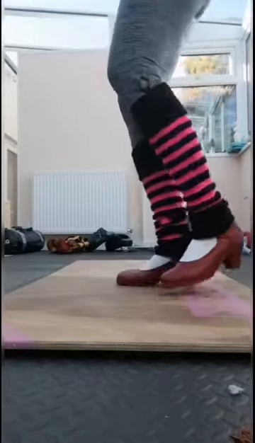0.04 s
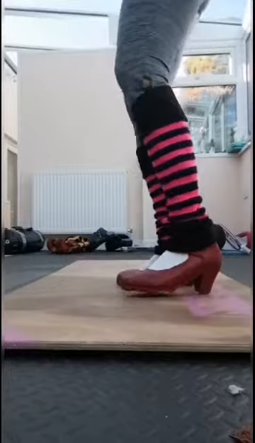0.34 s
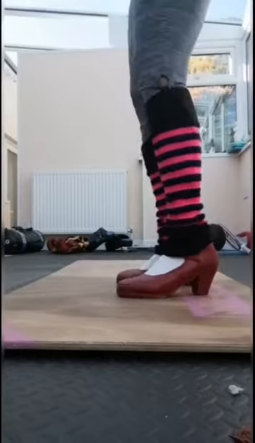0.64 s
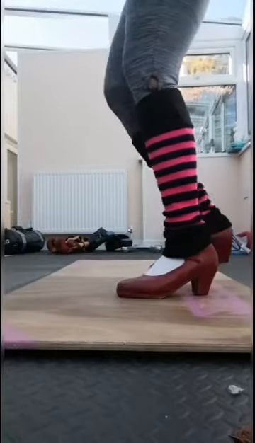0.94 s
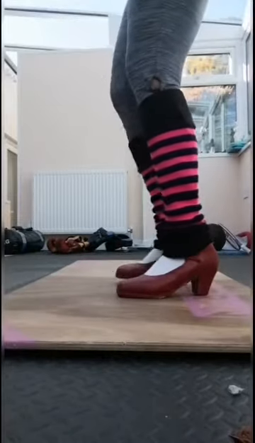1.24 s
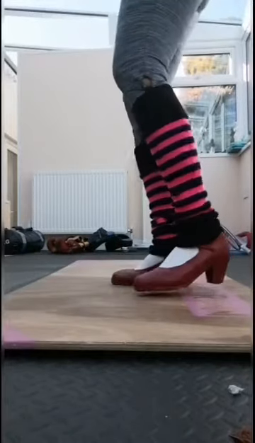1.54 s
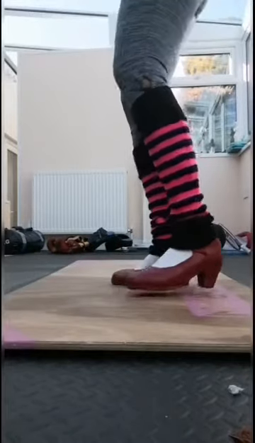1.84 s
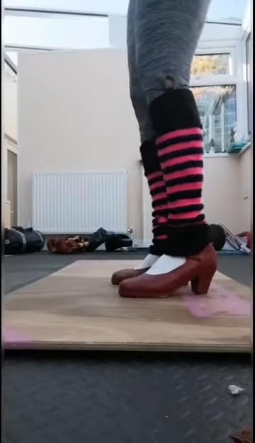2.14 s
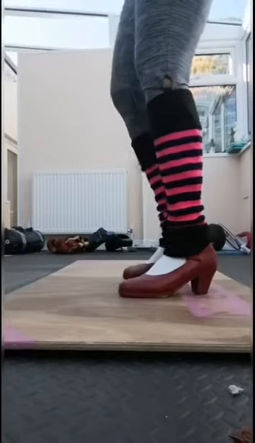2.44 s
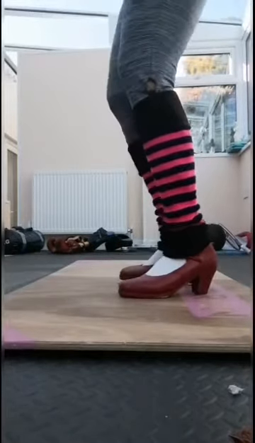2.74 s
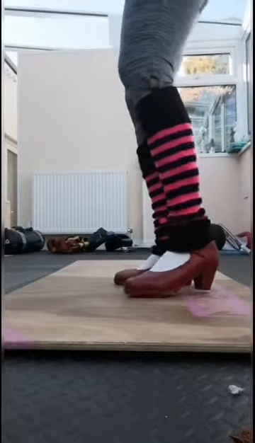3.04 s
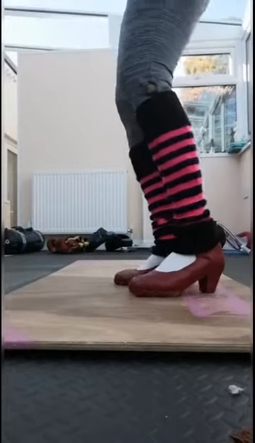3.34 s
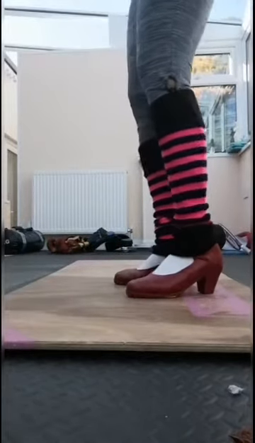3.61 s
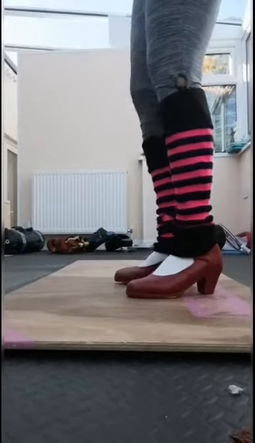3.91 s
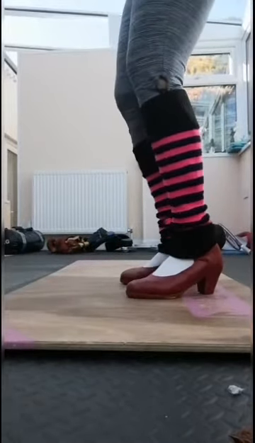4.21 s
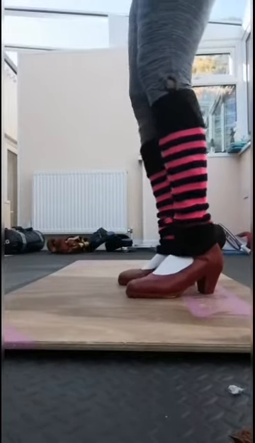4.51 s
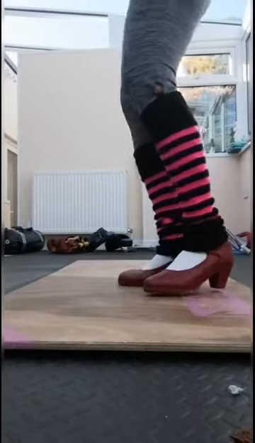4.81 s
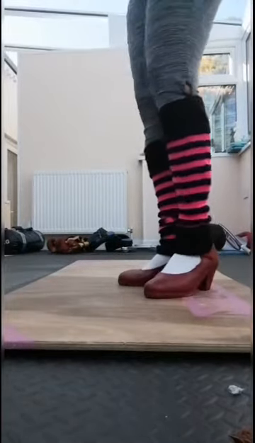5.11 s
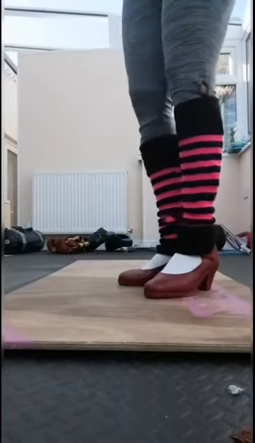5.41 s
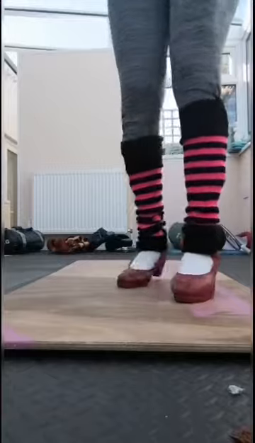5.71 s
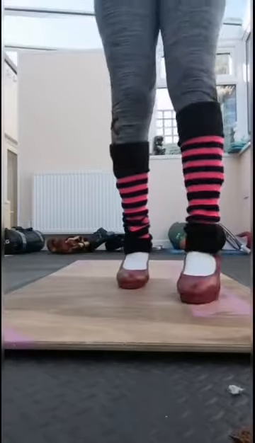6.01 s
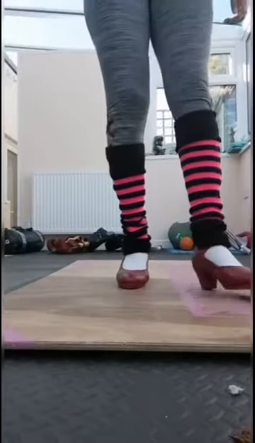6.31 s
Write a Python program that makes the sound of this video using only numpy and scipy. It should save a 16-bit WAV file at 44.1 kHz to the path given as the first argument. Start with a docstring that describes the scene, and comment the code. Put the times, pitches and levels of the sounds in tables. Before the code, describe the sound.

Hard-heeled shoes stamp on a wooden board in steady pairs, each slap and heel crack ringing in a bare room.

```python
"""Dance stamps on plywood

A dancer in hard-heeled shoes stamps on a plywood board in a bare, glazed room, twice with each foot. In each
stamp the sole slaps the board and the heel cracks down about 20 ms later; in the last stamp the two land almost
together. The shoes tick and rub as the weight shifts, and at the end they scuff round and step aside. The room
rings on, and a noise suppressor shortens the last of each echo."""
import sys
import numpy as np
from scipy import signal
from scipy.fft import rfft, irfft, next_fast_len
from scipy.io import wavfile
from scipy.ndimage import uniform_filter1d

SR = 44100
rng = np.random.default_rng(int(sys.argv[2]) if len(sys.argv) > 2 else 0)


def store_pcm(level_fs):
    """Save levels as 16-bit WAV."""
    pcm = np.round(np.clip(level_fs, -1, 1) * 32767).astype(np.int16)
    wavfile.write(sys.argv[1], SR, np.atleast_2d(pcm).T)


N = 288899
T = np.arange(N) / SR
HZ = np.fft.rfftfreq(2 * SR, 1 / SR) + 1e-3
NEAR, FAR, ASIDE = 0, 1, 2  # spots on the board

# tones of a heel on the board: (pitch [Hz], width [Hz], near level [dB], far level [dB])
HEEL_TONES = [(260, 130, 0.5, -4), (1120, 200, 11.5, 15.5), (1750, 190, 14.5, 10.5), (2760, 630, 9, 7),
              (3260, 510, 6, 8.5), (5230, 770, -4, 0.5), (6700, 550, -16, -8)]
# what a heel sends into the room: (frequency [Hz], level [dB])
HEEL_TO_ROOM = [(100, -12), (280, -3), (430, 17.5), (720, -2.5), (1150, 4.5), (2000, 2), (2800, 2.5),
                (3300, -3), (4000, -20), (4700, -5.5), (5500, 0), (7200, -12)]


def amp(db):
    """Turn decibels into a gain."""
    return 10 ** (np.asarray(db) / 20)


def unit(x):
    """Scale a sound to an average power of 1."""
    return x / np.sqrt(np.mean(x ** 2) + 1e-20)


def along(points, hz):
    """Read between (frequency, value) points, spaced by octaves."""
    freqs, values = np.transpose(points)
    return np.interp(np.log(hz + 1), np.log(freqs + 1), values)


def filtered(x, response):
    """Turn each frequency up or down by response(hz)."""
    size = next_fast_len(len(x) + SR // 2)
    return irfft(rfft(x, size) * response(np.fft.rfftfreq(size, 1 / SR)), size)[:len(x)]


def causal(gain):
    """Make a filter with these gains that sounds nothing before the blow."""
    cepstrum = irfft(np.log(np.maximum(gain, 1e-6)))
    cepstrum[1:SR] *= 2
    cepstrum[SR + 1:] = 0
    return np.exp(rfft(cepstrum))


def resonances(tones, hz):
    """How an object with these ringing tones answers each frequency."""
    return sum((-1) ** k * amp(db) * 1j * hz * width / (pitch ** 2 - hz ** 2 + 1j * hz * width)
               for k, (pitch, width, db) in enumerate(tones))


def at_spot(tones, spot):
    """Pick each tone's level for one spot on the board."""
    return [(hz, width, levels[spot]) for hz, width, *levels in tones]


def add(track, s, sound):
    """Mix a sound into the track at s seconds."""
    start = round(s * SR)
    part = sound[max(-start, 0):N - start]
    track[max(start, 0):][:len(part)] += part


def swell(peak_s, db, rise_db_per_s, fall_db_per_s):
    """A loudness curve that climbs to a peak and dies away."""
    return amp(db - rise_db_per_s * np.maximum(peak_s - T, 0) - fall_db_per_s * np.maximum(T - peak_s, 0))


def contact(hardness, pivot_hz, weight_db=0):
    """A harder, shorter blow has more treble (hardness in dB per octave); body weight adds bass."""
    octaves = np.log2(np.clip(HZ, 900, 7000) / pivot_hz)
    return amp(hardness * octaves + weight_db / (1 + (HZ / 280) ** 6))


def knock(tones, force, travel_s, rattle_db, rattle_fade_s=0.021):
    """The struck board bends in waves that bring the treble first: a tiny falling chirp."""
    struck = np.array(tones, float)
    struck[:, 2] += rng.standard_normal(len(struck))  # each tone varies by about 1 dB
    bending = np.exp(-4j * np.pi * travel_s * np.sqrt(1000 * (HZ + 300)))
    # short waves go on bouncing between the board's edges
    bounces = rng.standard_normal(SR) * amp(-60 * T[:SR] / rattle_fade_s)
    rattle = rfft(bounces / np.linalg.norm(bounces), 2 * SR) * HZ / (HZ + 1400)
    return irfft(resonances(struck, HZ) * causal(force) * bending * (1 + amp(rattle_db) * rattle))[:SR]


def room_tail(walls, gap_s, build_s, same_share=0.48):
    """Echoes start after a gap; the shared noise `walls` makes them partly repeat from blow to blow."""
    # how long the room rings: (frequency [Hz], time to fade by 60 dB [s])
    ring_times = [(100, 1), (200, 0.75), (420, 0.65), (1000, 0.83), (2500, 0.89), (7000, 0.79)]
    noise = np.sqrt(same_share) * walls + np.sqrt(1 - same_share) * rng.standard_normal(SR)
    hz, t, bands = signal.stft(noise, SR, nperseg=256)
    fade = amp(-60 * t / along(ring_times, hz)[:, None])
    tail = signal.istft(bands * fade, SR, nperseg=256)[1][:SR]
    tail *= 1 - np.exp(-np.maximum(T[:SR] - gap_s, 0) / build_s)
    return tail / np.linalg.norm(tail)


def echo(to_room, force, tail):
    """The room's answer to one blow."""
    return irfft(causal(amp(along(to_room, HZ)) * force) * rfft(tail, 2 * SR))[:SR]


def sole(walls, db, room_db, hardness, weight_db, spot):
    """The flat sole slaps the board; each spot brings out different tones."""
    # the plywood's tones: (pitch [Hz], width [Hz], near level [dB], far level [dB], side level [dB])
    board_tones = [(192, 27.5, 25.5, 27, 24.5), (332, 74, 12, 12.5, 18), (455, 70, 10, 12, 18.5),
                   (626, 93, 6.5, 12, 15.5), (870, 78, 14.5, 22, 16), (1098, 142, 17.5, 7.5, 9),
                   (1656, 200, 12.5, 5, 11), (2606, 220, 3, 0, -7.5), (3160, 97, -4, 3, -11.5),
                   (5500, 1800, -19.5, -31.5, -17.5)]
    # what the whole board sends into the room: (frequency [Hz], level [dB])
    board_to_room = [(40, -24), (80, 1), (102, 12), (125, 4), (195, 16), (275, 11.5), (370, 16),
                     (460, 14.5), (720, 7.5), (930, 8.5), (1400, -0.5), (2700, -2), (4000, -15.5),
                     (6000, -14)]
    force = contact(hardness, pivot_hz=950, weight_db=weight_db)
    slap = knock(at_spot(board_tones, spot), force, travel_s=0.0013, rattle_db=2.5)
    # the echo's bass partly follows the slap's strength, and its treble the hardness
    bass_db = 0.48 * (db - room_db)
    drive = contact(0.76 * hardness, pivot_hz=950, weight_db=weight_db + bass_db)
    room = echo(board_to_room, drive, room_tail(walls, gap_s=0.011, build_s=0.0024)) + boom()
    return amp(db) * slap + amp(room_db) * room


def boom(gain_db=-45, rise_s=0.033):
    """Waves caught between the walls swell and hum on after a blow."""
    # the room's own notes: (pitch [Hz], level [dB], time to fade by 60 dB [s])
    room_notes = [(153.6, -9, 1), (196.7, -5, 0.94), (360, -2.5, 0.86), (378.4, 0, 0.9), (394.3, -3, 1),
                  (438, 3, 0.71), (449.5, -1, 0.75), (552, -5, 0.89), (631, -11, 0.74)]
    t = T[:SR]
    waves = sum(amp(db - 60 * t / fade_s) * np.sin(2 * np.pi * (hz * t + rng.random()))
                for hz, db, fade_s in room_notes)
    return amp(gain_db) * waves * (1 - np.exp(-t / rise_s))


def heel(walls, db, spot):
    """The hard heel cracks, brighter when forceful; the far one is weaker and more smeared."""
    force = contact(hardness=-0.29 + 0.093 * db, pivot_hz=2060)
    crack = knock(at_spot(HEEL_TONES, spot), force, travel_s=0.00052, rattle_db=1 + 4 * spot)
    room = echo(HEEL_TO_ROOM, np.sqrt(force), room_tail(walls, gap_s=0.0031, build_s=0.009))
    crack_db = -1 - 5.5 * spot  # the near foot screens the far heel
    return amp(db) * (amp(crack_db) * crack + room)


def stamps(walls):
    """In each stamp the sole lands and the heel follows; in the last stamp the two land almost together."""
    # flat-foot stamps: (time [s], sole level [dB], sole hardness [dB per octave],
    # heel delay [s], heel level [dB], spot)
    blows = [(-0.11, -5, 3, 0.014, -1, FAR), (0.3289, -1.5, -0.5, 0.02, -11, NEAR),
             (0.526, -4.5, 3.5, .0198, 1, NEAR), (1.2793, 0, 2, 0.016, -3, FAR),
             (1.4664, -6.5, 1, 0.013, -3, FAR), (1.8898, -0.5, -.5, 0.022, -6.5, NEAR),
             (2.0906, -7.5, 2.5, 0.023, 1, NEAR), (2.8327, -4, 1.5, 0.016, -5, FAR),
             (3.0057, -9, 1.5, 0.014, -1.5, FAR), (3.4721, -0.5, 2, .0177, -5, NEAR),
             (3.6742, -8.5, 2.5, .0196, 0.5, NEAR), (4.3654, -3.5, -0.4, 0.016, -8.5, FAR),
             (4.5724, -7, 1, 0.015, -5.5, FAR), (5.0277, -1, 0.5, .0171, 0, NEAR),
             (5.2417, -13, 2, 0.003, -5, FAR)]
    out = np.zeros(N)
    for s, sole_db, hardness, delay_s, heel_db, spot in blows:
        room_db = 2.05 + 0.26 * sole_db  # the ringing grows more slowly than the slap
        add(out, s, sole(walls, sole_db, room_db, hardness, weight_db=1.7, spot=spot))
        add(out, s + delay_s, heel(walls, heel_db, spot))
    return out


def room_air(level_db=-70):
    """The still air of the room makes a faint, steady hush."""
    # the hush from bass to treble: (frequency [Hz], level [dB])
    hush = [(12, -27.5), (20, -9), (59, 1), (71, -13), (102, -7), (113, -19), (226, -12.5), (320, -12.5),
            (903, -34.5), (2680, -34), (4090, -36), (6870, -23.5), (7400, -27), (9620, -63.5),
            (16300, -120)]
    return amp(level_db) * unit(filtered(rng.standard_normal(N), lambda hz: amp(along(hush, hz))))


def board_groan(resting_db=-82):
    """The dancer's weight stirs the board's lowest tones, more so as it changes feet."""
    # shifts of weight: (time [s], level [dB])
    shifts = [(1.05, -56), (2.58, -69)]
    low_tones = [(90, 220, -0.63), (185, 62, -0.37)]  # (pitch [Hz], width [Hz], level [dB])
    groan = unit(filtered(rng.standard_normal(N), lambda hz: resonances(low_tones, hz)))
    load = sum(swell(s, db, rise_db_per_s=73, fall_db_per_s=130.5) for s, db in shifts)
    return (amp(resting_db) + load) * groan


def rub(hardness, slips_per_s=1200):
    """A sliding sole sticks and slips in many tiny jerks."""
    # tones of the rubbing sole: (pitch [Hz], width [Hz], level [dB])
    rub_tones = [(233, 30, -1), (443, 40, 4), (1220, 190, -4), (1760, 350, -11.5), (2670, 290, -9.5),
                 (3270, 300, -12.5), (5600, 1300, -15.5)]
    slips = (rng.random(N) < slips_per_s / SR) * rng.standard_normal(N)
    colour = lambda hz: resonances(rub_tones, hz) * amp(hardness * np.log2(np.clip(hz, 200, 7000)))
    return unit(filtered(slips, colour))


def slides(walls, direct_db=-5, room_db=-1):
    """Each slide speeds up quickly and is braked by the wood; the room answers."""
    # a sole turning or brushing: (time of fastest slip [s], level [dB], hardness [dB per octave])
    strokes = [(1.021, -60.5, 4.5), (2.579, -65, -3.5), (5.664, -54.5, 1.5), (5.778, -39.5, 0.2),
               (5.803, -39.5, -0.8), (5.923, -42.5, -0.1), (6.255, -53.5, 6.5)]
    scuffs = sum(rub(hardness) * swell(s, db, rise_db_per_s=559.5, fall_db_per_s=330)
                 for s, db, hardness in strokes)
    room = signal.fftconvolve(scuffs, room_tail(walls, gap_s=0.0055, build_s=0.0024))[:N]
    return amp(direct_db) * scuffs + amp(room_db) * room


def ticks(walls):
    """The shoes tick thinly on the board as the weight shifts."""
    # light touches: (time [s], level [dB])
    touches = [(1.0535, -34), (1.0640, -33), (1.1030, -29), (2.6950, -35), (4.2188, -43), (5.2620, -20),
               (5.8110, -23)]
    out = np.zeros(N)
    force = contact(hardness=7.3, pivot_hz=3050)
    for s, db in touches:
        room = echo(HEEL_TO_ROOM, force, room_tail(walls, gap_s=0.01, build_s=0.005))
        tick = knock(at_spot(HEEL_TONES, NEAR), force, travel_s=0.0013, rattle_db=-4)
        add(out, s, amp(db) * (tick + amp(-5.5) * room))
    return out


def steps(walls, room_boost_db=4):
    """The dancer turns away in three lighter steps; in the last, the heel lands softly after the sole."""
    # three soles landing, then the soft heel:
    # (time [s], level [dB], hardness [dB per octave], bass from body weight [dB])
    landings = [(5.6604, -29.5, 2.5, 8.5), (5.9146, -14.5, 2.5, -6.5), (6.1664, -6, -7, 1),
                (6.186, -15, -4.5, -7)]
    out = np.zeros(N)
    for s, db, hardness, weight_db in landings:
        add(out, s, sole(walls, db, db + room_boost_db, hardness, weight_db, ASIDE))
    return out


def scene():
    """All the footwork in one room."""
    walls = rng.standard_normal(SR)
    return (stamps(walls) + steps(walls) + ticks(walls) + slides(walls) + room_air() + board_groan())[None]


def suppressor(x, depth_db=6, threshold_db=15):
    """Turn each frequency band down when it sinks near its own background noise."""
    bands = signal.stft(x, nperseg=512)[2]
    power = uniform_filter1d(np.abs(bands) ** 2, size=5, axis=0)  # smooth over frequency
    power = uniform_filter1d(power, size=4, axis=1)  # then over time
    level = np.sqrt(np.abs(power)) + 1e-12
    floor = np.percentile(level, 10, axis=1, keepdims=True)
    closed = 1 / (1 + (level / (floor * amp(threshold_db))) ** 4)
    return signal.istft(bands * amp(-depth_db * closed), nperseg=512)[1][:N]


def record(dry, top_hz=7330, leak_hz=11200, leak_db=-37):
    """Suppress the noise, then cut the high treble so that only a trace leaks through."""
    below = lambda hz, edge: 1 / np.sqrt(1 + (hz / edge) ** 150)
    treble_cut = lambda hz: below(hz, top_hz) + amp(leak_db) * below(hz, leak_hz)
    return filtered(suppressor(dry[0]), treble_cut)[None]


dry = scene()
out = record(dry)
store_pcm(out)
```